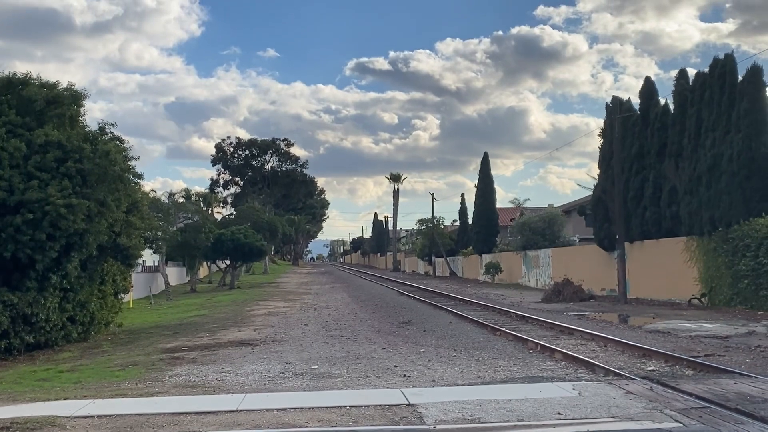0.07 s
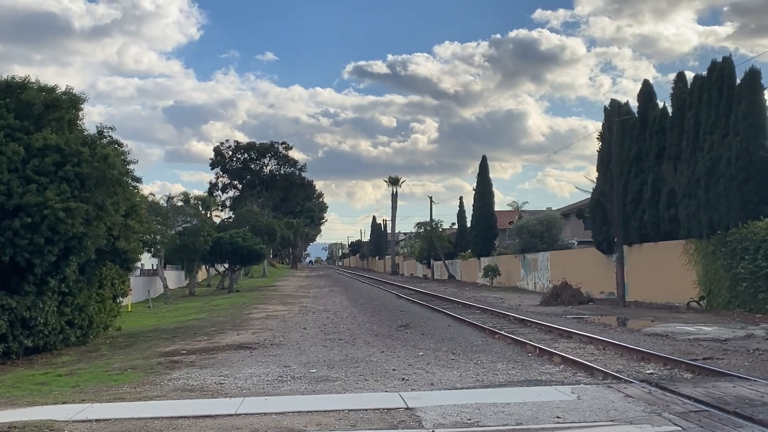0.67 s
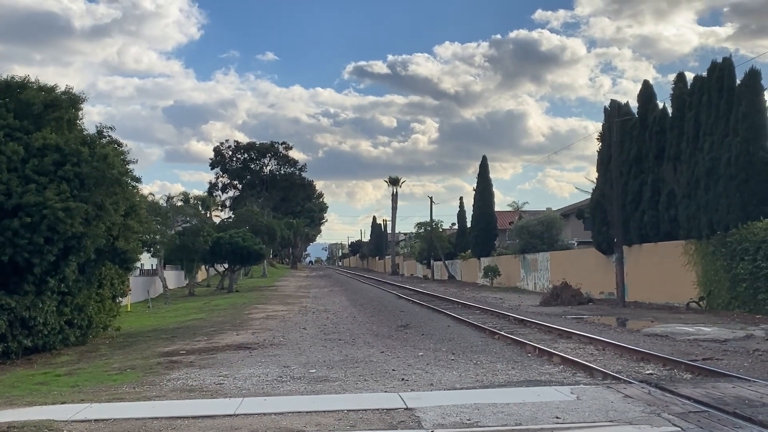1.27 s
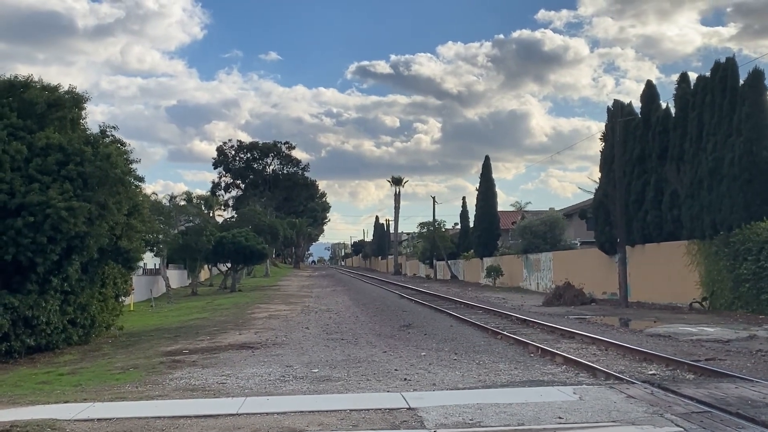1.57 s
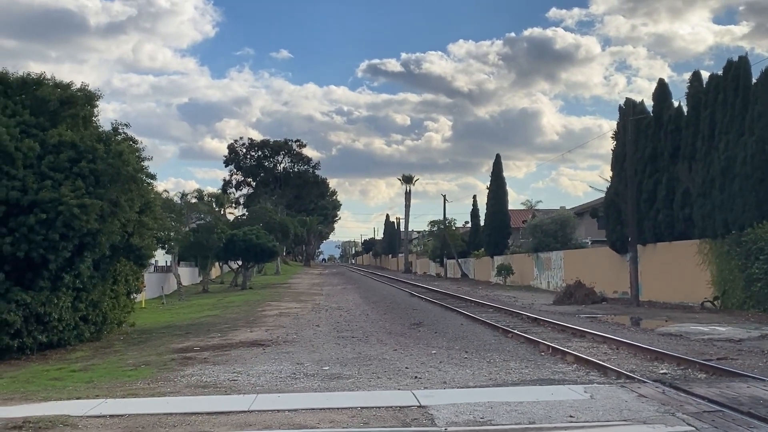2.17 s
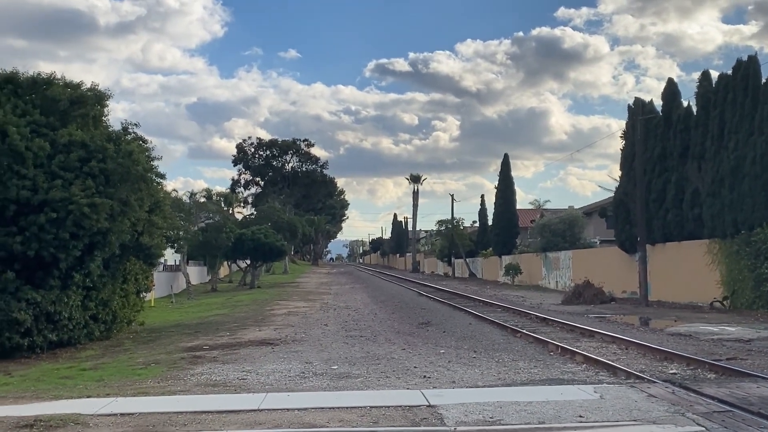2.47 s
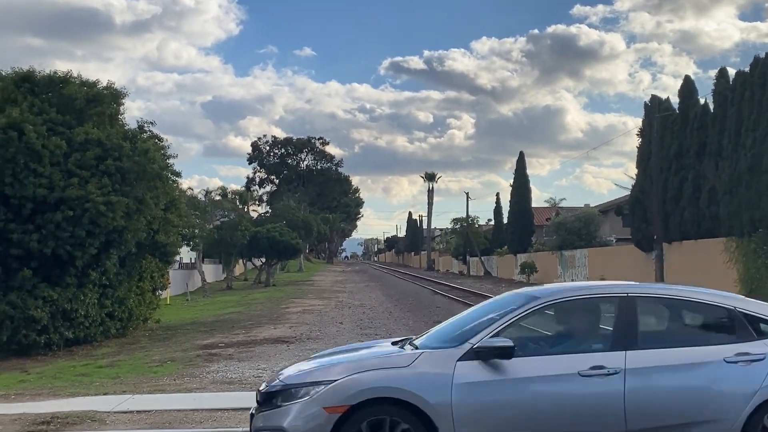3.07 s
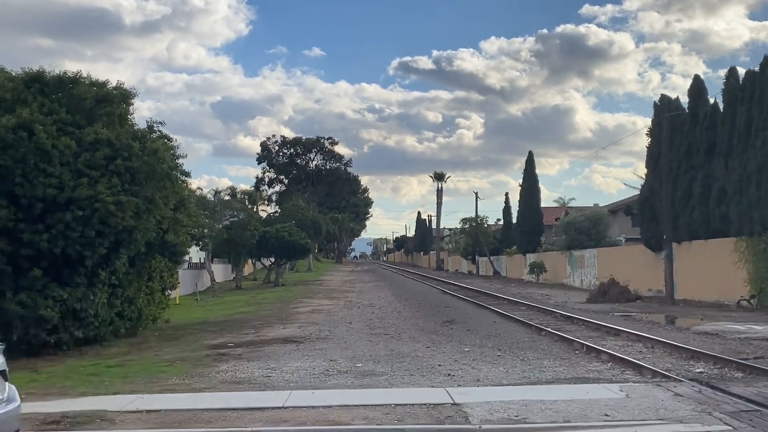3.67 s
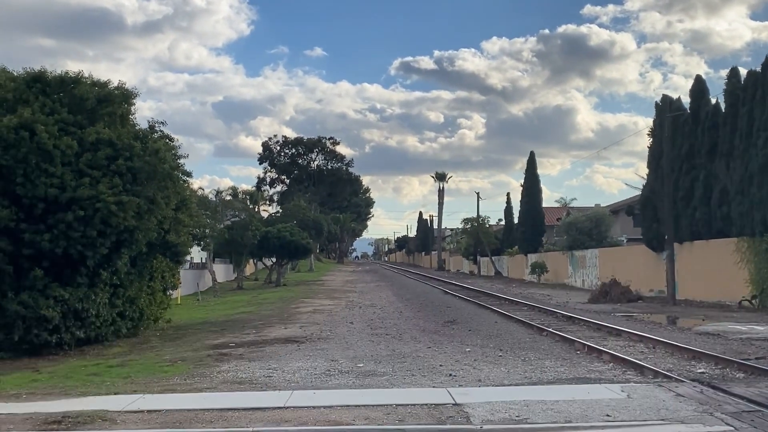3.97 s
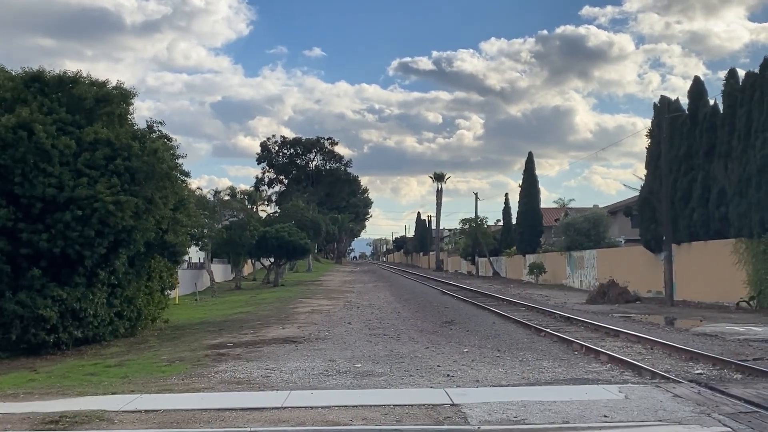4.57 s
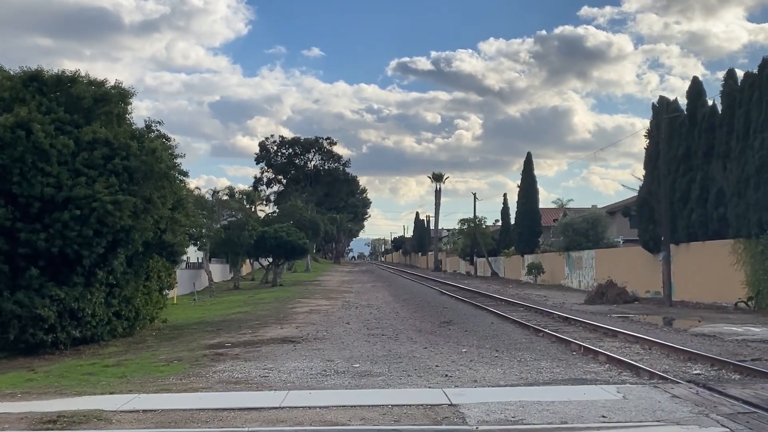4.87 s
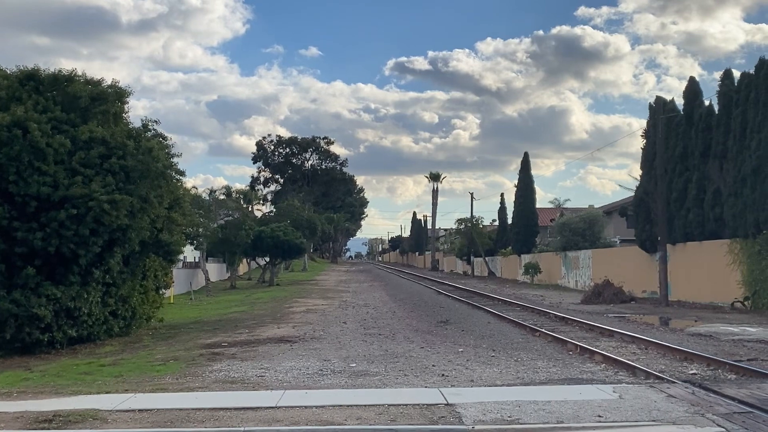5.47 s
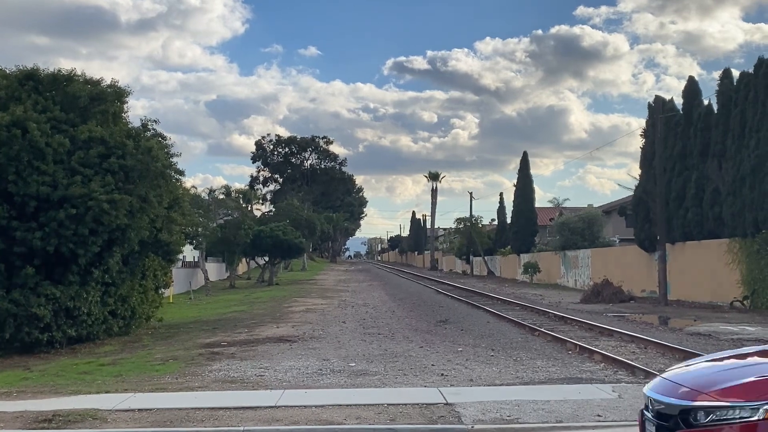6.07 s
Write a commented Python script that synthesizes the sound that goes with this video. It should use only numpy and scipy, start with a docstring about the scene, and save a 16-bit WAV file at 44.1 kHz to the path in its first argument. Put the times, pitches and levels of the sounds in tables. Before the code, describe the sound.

Two cars pass right to left in turn, tyres clunking and snapping over railway crossing rails, above a low outdoor traffic rumble.

```python
"""A level crossing in town, a pair of microphones 7 m from the lane, traffic rumbling down the street.
A car rolls in from the right; from 2.4 s its tyres snap and clunk on the rails, drum over the panels
and fling grit. It pulls away to the left with a droning exhaust and a thin, faint squeal.
A second car comes up meanwhile, its tyres roaring more hollowly, meets the rails from 5.7 s
and is almost abreast of the microphones at the end."""
import sys
import numpy as np
from scipy import signal
from scipy.fft import rfft, irfft, next_fast_len
from scipy.io import wavfile

SR = 44100
rng = np.random.default_rng(int(sys.argv[2]) if len(sys.argv) > 2 else 0)


def log_audio(samples):
    """Write samples as a 16-bit WAV file to the path given in sys.argv[1]."""
    # one column per channel
    frames = np.atleast_2d(samples).T
    # limit to full scale, then quantise
    limited = np.clip(frames, -1, 1)
    pcm = np.round(limited * 32767).astype(np.int16)
    wavfile.write(sys.argv[1], SR, pcm)


N = 277925
TIME = np.arange(N) / SR

# spectra of the distant traffic and the town's deep rumble: freq_hz, density_db
TRAFFIC_SPECTRUM = [(25, -34), (45, 2.5), (90, -6.5), (180, -14), (280, -2.5), (420, -17), (1000, -27),
                    (2000, -27.5), (5000, -84.5)]
TOWN_RUMBLE_SPECTRUM = [(25, -29.5), (48, -14.5), (70, 3.5), (105, 5), (150, 5), (230, -33)]
# engines further off: pitch_hz, level_db, fade_start_s
FAR_ENGINES = [(45.2, -42, 1.5), (89.2, -43, 5.7), (116, -37, 0.36)]

# each car: abreast_s, speed_m_per_s, on_panels_s, off_panels_s
FIRST_CAR = (3.096, 10.2, 2.466, 2.84)
SECOND_CAR = (6.484, 10.5, 5.79, 6.5)
LANE_M = 7.13   # from the microphones
# the first car's exhaust: time_s, firing_hz, firing_db, third_harmonic_db
EXHAUST_CURVE = [(3.0, 46.47, -7.5, -13.5), (3.18, 46.96, -25.5, -29), (3.33, 48.2, -27.5, -25.5),
                 (3.97, 48.08, -27, -30), (4.7, 47.05, -34.5, -29.5), (5.25, 45.87, -42, -36.5)]
# its weaker harmonics: multiple, level_re_third_db
EXHAUST_OVERTONES = [(2, -16.5), (5, -14), (7, -13.5)]

# spectra of body rumble, carcass drum, each car's roar, tread hiss and grit fizz: freq_hz, density_db
RUMBLE_SPECTRUM = [(20, -54), (33, -1), (45, -1), (65, 9.5), (90, 5), (140, 3.5), (220, -18), (500, -76)]
DRUM_SPECTRUM = [(70, -26.5), (130, 2), (250, 4), (320, 0), (400, -7), (470, -1.5), (700, -10),
                 (1500, -26.5)]
FIRST_ROAR_SPECTRUM = [(300, -29.5), (540, -9), (760, -4), (1000, 1.5), (1400, -2.5), (1850, -12),
                       (2700, -14.5), (3600, -22.5), (6000, -35.5)]
SECOND_ROAR_SPECTRUM = [(350, -28), (550, -18), (780, 5.5), (1020, 5), (1400, 0), (1750, -18), (2250, -8.5),
                        (6000, -28)]
HISS_SPECTRUM = [(1500, -35), (3000, 6), (4200, 1), (5500, 0.5), (7200, -5), (10000, -9.5), (14000, -27)]
FIZZ_SPECTRUM = [(5000, -21.5), (7500, -3.5), (11000, -9.5), (13500, -8.5), (15000, -17), (16000, -24)]
# bands of tyre roar that rise in pitch as a car passes: abreast_hz, climb_hz, width_hz, level_db
CLIMBING_ROAR_BANDS = [(1004, 300, 203, -7), (1483, 170, 163, -9.5), (1803, 750, 380, -15.5)]
# how each tyre sound carries: abreast_db, loss_per_tenfold_distance_db, from_behind_db, on_panels_db
RUMBLE_LAW = (-38, 33, -4, 15.5)
DRUM_LAW = (-32.5, 20, 2, 7.5)
ROAR_LAW = (-36.5, 17, -1, 2.5)
HISS_LAW = (-54.5, 17, 4, 5)
FIZZ_LAW = (-54.5, 32.5, 3, 8)
CLIMBING_ROAR_LAW = (-35.5, 46.5, 15.5, -25)
SONG_LAW = (-41.5, 47.5, -11, -1)
HOLLOW_LAW = (-44.5, 37, -7, 4)

# loose grit flung across the road: start_s, level_db
GRIT_SPRAYS = [(2.436, -55), (2.605, -45), (2.76, -42), (2.865, -50), (5.257, -50), (5.826, -49),
               (6.007, -45), (6.215, -47)]
# small stones pinched under the tread: start_s, level_db
PINCHED_STONES = [(2.053, -35), (5.045, -40), (5.644, -33.5), (5.885, -35), (6.1272, -22)]
# the suspension takes a blow: start_s, level_db, pitch_hz
SUSPENSION_THUDS = [(2.614, -18, 210), (2.748, -15, 160), (2.885, -13, 107), (3.018, -11.5, 84),
                    (3.037, -14.5, 102), (5.845, -17, 99), (6.224, -14.5, 87), (6.257, -12.5, 65)]
# a tyre meets a rail edge, lands beyond the gap or bumps over a panel joint:
# start_s, snap_db, crack_db, knock_db, knock_hz
TYRE_CONTACTS = [(2.436, -30, -51, -13, 810), (2.5318, -22.5, -23, -13.5, 1000),
                 (2.5792, -24.5, -24, -11.5, 755), (2.6026, -16.5, -22.5, -10, 1010),
                 (2.6104, -23, -39, -6, 900), (2.7393, -12.5, -26, -11.5, 1250),
                 (2.754, -21, -35, -11.5, 607), (2.8151, -23.5, -46, -14, 990),
                 (2.863, -20.5, -23.5, -9.5, 670), (2.87, -27, -31, -13, 620),
                 (2.9972, -17.5, -33, -16, 1130), (3.0063, -22.5, -30, -11.5, 1040),
                 (3.0132, -23.5, -42, -11.5, 880), (3.0729, -37, -48, -18, 1170),
                 (5.68, -38, -46, -17, 1080), (5.766, -41.5, -38, -19, 1070),
                 (5.8147, -21.5, -22, -10.5, 930), (5.826, -21, -22, -4.5, 897),
                 (5.844, -23.5, -27, -13.5, 840), (5.938, -29, -47, -12, 900),
                 (5.9724, -17, -19, -11.5, 1130), (5.981, -26.5, -24, -8.5, 485),
                 (6.1278, -24.5, -27, -13.5, 920), (6.2372, -27, -30, -11, 930),
                 (6.277, -22, -33, -16, 800), (6.2828, -26, -21, -14.5, 1150)]
# ring of tyre and crossing panel: pitch_hz, level_db, t60_s
TYRE_PANEL_MODES = [(217.7, -7, 0.29), (288.6, -2.5, 0.078), (463, -9, 0.12), (633, -13.5, 0.14),
                    (1046, 2, 0.019)]

# the microphone ports turn the treble differently: freq_hz, left_lead_rad
MIC_PHASE = [(2800, 0), (3300, -.3), (4700, 0), (5600, -.75), (6800, -.3), (7400, 1.8), (8400, 3.1),
             (9500, 3.1), (11400, 6.1), (13000, 6.4), (14400, 9.1)]
# strength of the two ports: freq_hz, left_minus_right_db
MIC_BALANCE = [(120, -1.2), (1100, -.6), (1650, 2.6), (2300, .3), (4000, 0)]


def from_db(db):
    """Decibels to gain."""
    return 10 ** (np.asarray(db) / 20)


def rms_one(x):
    """Scale to unit power."""
    return x / np.sqrt(np.mean(x ** 2) + 1e-20)


def cut(x, hz, kind, order=2):
    """Butterworth filter."""
    sos = signal.butter(order, np.clip(hz, 10, .45 * SR), kind, fs=SR, output="sos")
    return signal.sosfilt(sos, x + 1e-18)


def drift(rate_hz):
    """Random wander, mostly slower than rate_hz, rms 1."""
    hz = np.arange(N // 2 + 1) * SR / N
    return rms_one(irfft(rfft(rng.standard_normal(N)) / (1 + (hz / rate_hz) ** 2), N))


def noise(spectrum):
    """Noise of a given colour, rms 1."""
    size = next_fast_len(N, True)
    hz, db = np.transpose(spectrum)
    bins = np.arange(1, size // 2 + 2) * SR / size
    gain = from_db(np.interp(np.log(bins), np.log(hz), db, left=-120, right=-120))
    return rms_one(irfft(rfft(rng.standard_normal(size)) * gain, size)[:N])


def band(centre_hz, width_hz):
    """A band of noise around a steady or moving centre, rms 1."""
    phase = 2 * np.pi * np.cumsum(centre_hz * np.ones(N)) / SR
    slow = cut(rng.standard_normal((2, N)), width_hz, "low", order=3)
    return rms_one(slow[0] * np.sin(phase) + slow[1] * np.cos(phase))


def grains(t, per_s):
    """Sparse clicks of random size, rms 1 on average."""
    return rng.standard_normal(len(t)) * (rng.random(len(t)) < per_s / SR) * np.sqrt(SR / per_s)


def decay(t, db, t60):
    """An envelope that starts at db and falls 60 dB in t60 seconds."""
    return from_db(db - 60 * t / t60)


def add(track, start_s, sound):
    """Mix a sound in at a time."""
    start = round(start_s * SR)
    track[start:start + len(sound)] += sound[:N - start]


def place(x, bearing, shade_db=6.0, shade_hz=1000, port_lag_s=0.00043, merge_hz=1687):
    """Lows reach the nearer microphone first and its mids are stronger; the treble stays central."""
    hz, frame_s, frames = signal.stft(x, SR, nperseg=256)
    hz, side = hz[:, None], np.interp(frame_s, TIME, bearing * np.ones(N))
    lag = (side * port_lag_s - 0.00006) * (hz / merge_hz) ** 0.25   # the ports face slightly left
    lead = np.angle(np.exp(2j * np.pi * hz * lag) + (hz / merge_hz) ** 10)
    near = from_db(.5 * shade_db * side * np.exp(-10 * (hz / shade_hz - 1) ** 2))
    return signal.istft(np.array([frames * near * np.exp(1j * lead), frames / near]), SR)[1][:, :N]


def town(bearing=-0.65, waver=0.0147, fade_s=0.37):
    """Far background: diffuse traffic down the street to the right, with a few wavering engine notes."""
    traffic = place(noise(TRAFFIC_SPECTRUM), bearing)
    diffuse = from_db(-5) * np.array([noise(TRAFFIC_SPECTRUM), noise(TRAFFIC_SPECTRUM)])
    out = from_db(-39) * (traffic + diffuse) + from_db(-42) * noise(TOWN_RUMBLE_SPECTRUM)
    for hz, db, fade_start_s in FAR_ENGINES:
        phase = 2 * np.pi * np.cumsum(hz * (1 + waver * drift(2.35))) / SR
        fade = np.clip(1 - (TIME - fade_start_s) / fade_s, 0, 1)
        out += from_db(db) * fade * np.sqrt(2) * np.sin(phase)
    return out


def street_echoes(x, echo_db, wall_hz):
    """A few dull echoes from walls and hedges, different at each microphone."""
    dull, out = cut(x, wall_hz, "low"), np.zeros((2, N))
    for k, delay_s in enumerate(rng.uniform(0.0054, .12, size=10)):
        add(out[k % 2], delay_s, dull * decay(delay_s, echo_db, t60=1))
    return out


def wall_screening(car, clear_m, db_per_m):
    """Gain of a car that walls along the street screen until it has come near."""
    abreast_s, speed = car[:2]
    return from_db(-db_per_m * np.maximum(speed * (abreast_s - TIME) - clear_m, 0))


def path(car):
    """Distance in lane distances, and sine of the bearing (+ is left), of a car at steady speed."""
    abreast_s, speed = car[:2]
    along_m = speed * (TIME - abreast_s)
    distance_m = np.hypot(along_m, LANE_M)
    return distance_m / LANE_M, along_m / distance_m


def carried(car, law, trim_db, apron_share=0.5, apron_s=0.29, attack_s=0.12, release_s=0.46):
    """Gain of a tyre sound: falls with distance, differs fore and aft, changes on rough ground."""
    abreast_db, loss_db, behind_db, panel_db = law
    on_s, off_s = car[2:]
    distance, bearing = path(car)
    apron = np.clip(1 + (TIME - on_s) / apron_s, 0, 1)   # worn asphalt before the panels
    panels = np.clip((TIME - on_s) / attack_s, 0, 1)
    leaving = np.clip(1 - (TIME - off_s) / release_s, 0, 1)
    rough = (panels + apron_share * (apron - panels)) * leaving
    passing_db = abreast_db - loss_db * np.log10(distance) + behind_db * bearing
    return from_db(passing_db + panel_db * rough + trim_db)


def squeal(peak_s=3.46, spread_s=0.16):
    """A thin, faint squeal as the first car goes by."""
    swell = np.exp(-.5 * ((TIME - peak_s) / spread_s) ** 2)
    return from_db(-62) * swell * band(centre_hz=5720, width_hz=120)


def exhaust(firing_trim_db=-2.5, third_trim_db=-4.0, flutter=0.62, jitter=0.00729, waver_db=1.43):
    """Firing tone and harmonics of the first car's engine, pulling away under light load."""
    times_s, *columns = np.transpose(EXHAUST_CURVE)
    hz, firing_db, third_db = (np.interp(TIME, times_s, column) for column in columns)
    phase = 2 * np.pi * np.cumsum(hz * (1 + jitter * drift(6.05))) / SR
    tone = from_db(firing_db + firing_trim_db) * np.sin(phase)
    tone += from_db(third_db + third_trim_db) * np.sin(3 * phase)
    for multiple, db in EXHAUST_OVERTONES:
        gain = from_db(third_db + db) * (1 + flutter * drift(40))
        tone += gain * np.sin(multiple * phase + rng.uniform(0, 2 * np.pi))
    waver = from_db(waver_db * (drift(6.6) + 0.7 * drift(30)))
    return np.sqrt(2) * tone * waver * np.interp(TIME, [2.95, 3.25, 4.9, 5.7], [0, 1, 1, 0])


def tread_song(car, trim_db, centre_hz, width_hz, beam_db=16):
    """Air rings in the tread grooves and is beamed along the road."""
    broadside = 1 - path(car)[1] ** 2
    return carried(car, SONG_LAW, trim_db - beam_db * broadside) * band(centre_hz, width_hz)


def climbing_roar(car, trim_db):
    """Bands of tyre roar that rise in pitch as the car passes the microphones."""
    bearing = path(car)[1]
    bands = sum(from_db(db) * band(hz + climb_hz * bearing, width_hz)
                for hz, climb_hz, width_hz, db in CLIMBING_ROAR_BANDS)
    return carried(car, CLIMBING_ROAR_LAW, trim_db) * bands


def hollow_roar(car, trim_db, centre_hz, width_hz, flutter_db=2.5):
    """A hollow resonance of the tyres that swells on the panels."""
    return carried(car, HOLLOW_LAW, trim_db + flutter_db * drift(30)) * band(centre_hz, width_hz)


def rolling(car, roar_spectrum, rumble_db, drum_db, roar_db, hiss_db, fizz_db):
    """Road texture shakes the body, drums the carcass, pumps air from the tread and crunches grit."""
    bumps_db = 1.5 * drift(32)
    rumble = carried(car, RUMBLE_LAW, rumble_db, apron_share=0.098) * noise(RUMBLE_SPECTRUM)
    drum = carried(car, DRUM_LAW, drum_db + bumps_db) * noise(DRUM_SPECTRUM)
    roar = carried(car, ROAR_LAW, roar_db + bumps_db) * noise(roar_spectrum)
    hiss = carried(car, HISS_LAW, hiss_db + drift(120)) * noise(HISS_SPECTRUM)
    fizz = carried(car, FIZZ_LAW, fizz_db + bumps_db + drift(300)) * noise(FIZZ_SPECTRUM)
    return rumble + drum + roar + hiss + fizz


def grit_sprays():
    """Flung grit patters down in a short, very bright crackle."""
    out, t = np.zeros(N), TIME[:SR // 5]
    for start_s, db in GRIT_SPRAYS:
        add(out, start_s, cut(grains(t, per_s=1500) * decay(t, db, t60=0.23), 9000, "high"))
    return out


def stone_cracks():
    """Each stone pinched under the tread gives one hard, metallic crack."""
    out, t = np.zeros(N), TIME[:SR // 20]
    for start_s, db in PINCHED_STONES:
        crack = rms_one(cut(rng.standard_normal(len(t)), [2900, 5300], "band", order=3))
        add(out, start_s, crack * decay(t, db, t60=0.0072))
    return out


def suspension_thuds(cycles=1.88):
    """The springs give once and are quickly damped: a short, deep thud."""
    out = np.zeros(N)
    for start_s, db, hz in SUSPENSION_THUDS:
        t = TIME[:int(cycles * SR / hz)]
        add(out, start_s, -from_db(db) * np.sin(2 * np.pi * hz * t) * signal.windows.tukey(len(t)))
    return out


def tyre_snaps(full_strength_hz=3520, hz_per_db=46.5, spread=1.217):
    """Trapped air pops, with a bright crack of tread on steel; a short rattle and faint tail follow."""
    out, t = np.zeros(N), TIME[:SR // 5]
    for start_s, snap_db, crack_db, _, _ in TYRE_CONTACTS:
        hz = full_strength_hz + hz_per_db * snap_db   # a softer pinch rings lower
        pop = cut(signal.unit_impulse(len(t)), [hz / spread, hz * spread], "band", order=3)
        rattle = 2 * grains(t, per_s=2500) * (decay(t, -15, t60=0.025) + decay(t, -29, t60=0.67))
        snap = from_db(snap_db) * (pop / abs(pop).max() + cut(rattle, [1200, 4600], "band"))
        crack = cut(rng.standard_normal(len(t)) * decay(t, crack_db, t60=0.0043), 3000, "high")
        add(out, start_s, snap + cut(crack, 7000, "low", order=1))
    return out


def tyre_clunks(attack_s=0.00013, sag=0.67, sag_s=0.0032, body_db=-6.0, detune=0.0615):
    """A knock that falls in pitch as the tread flattens; the tyre rings and the panel shakes."""
    out, t = np.zeros(N), TIME[:SR // 3]
    flattening = 1 - np.exp(-t / sag_s)
    for start_s, _, _, db, hz in TYRE_CONTACTS:
        phase = 2 * np.pi * np.cumsum(hz * (1 - sag * flattening)) / SR
        knock_t60 = np.interp(db, [-14, -5], [0.0092, 0.029])   # longer when heavy
        knock = np.sin(phase) * decay(t, 1.0, knock_t60) * (1 - np.exp(-t / attack_s))
        body = np.zeros(len(t))
        for mode_hz, mode_db, t60 in TYRE_PANEL_MODES:
            ring_hz = mode_hz * (1 + detune * rng.normal())
            body += np.sin(2 * np.pi * ring_hz * t) * decay(t, body_db + mode_db, t60)
        shake = rms_one(cut(rng.standard_normal(len(t)), [200, 1050], "band")) * decay(t, -19, t60=0.27)
        add(out, start_s, from_db(db) * cut(knock + (body + shake) * flattening, 2800, "low"))
    return out


def scene():
    """Both cars close in front of the microphones, with street echoes and the town behind."""
    blows = tyre_snaps() + tyre_clunks() + suspension_thuds() + stone_cracks() + grit_sprays()
    first = (rolling(FIRST_CAR, FIRST_ROAR_SPECTRUM,
                     rumble_db=0.5, drum_db=-0.5, roar_db=-0.67, hiss_db=-0.3, fizz_db=-7)
             + tread_song(FIRST_CAR, trim_db=4.0, centre_hz=1780, width_hz=380)
             + climbing_roar(FIRST_CAR, trim_db=0.5))
    second = (rolling(SECOND_CAR, SECOND_ROAR_SPECTRUM,
                      rumble_db=1, drum_db=-2.0, roar_db=-3.5, hiss_db=-5.5, fizz_db=-9)
              + tread_song(SECOND_CAR, trim_db=3.0, centre_hz=1765, width_hz=320)
              + climbing_roar(SECOND_CAR, trim_db=-10.0)
              + hollow_roar(SECOND_CAR, trim_db=-3.0, centre_hz=827, width_hz=234))
    first *= wall_screening(FIRST_CAR, clear_m=18.4, db_per_m=0.28)
    second *= wall_screening(SECOND_CAR, clear_m=19, db_per_m=0.4)
    from_second = TIME > 5   # the later blows come from the second car
    direct = (place(first + exhaust() + blows * ~from_second, path(FIRST_CAR)[1])
              + place(second + blows * from_second, path(SECOND_CAR)[1]))
    echoes = (street_echoes(blows, echo_db=-21, wall_hz=2500)
              + street_echoes(first + second, echo_db=-22.5, wall_hz=7240))
    return direct + echoes + squeal() + town()


def record(dry):
    """The two microphone ports differ in phase and strength; deep bass and the top are cut."""
    size = next_fast_len(N + SR // 10, True)
    bins = np.arange(size // 2 + 1) * SR / size
    lead_rad = np.interp(bins, *np.transpose(MIC_PHASE))
    balance_db = np.interp(bins, *np.transpose(MIC_BALANCE))
    half = np.array([[.5], [-.5]])   # each side takes half the difference
    ports = np.exp(1j * lead_rad * half) * from_db(balance_db * half)
    sound = irfft(rfft(dry, size) * ports, size)[:, :N]
    sound = cut(sound, 37.6, "high", order=8)
    return signal.sosfilt(signal.cheby2(12, 70, 16000, fs=SR, output="sos"), sound)


dry = scene()
out = record(dry)
log_audio(out)
```